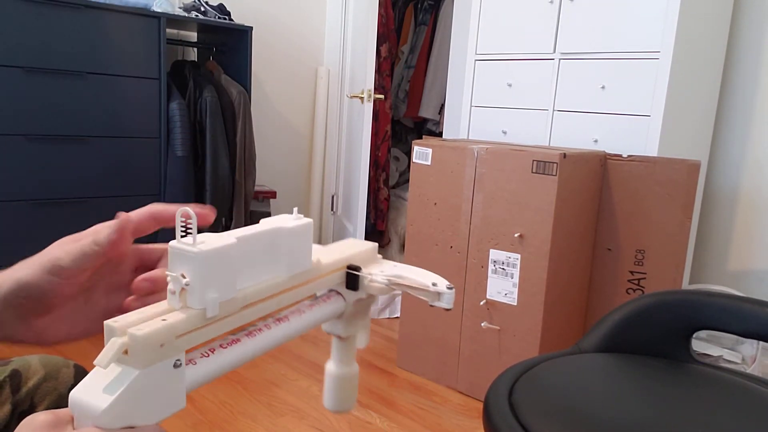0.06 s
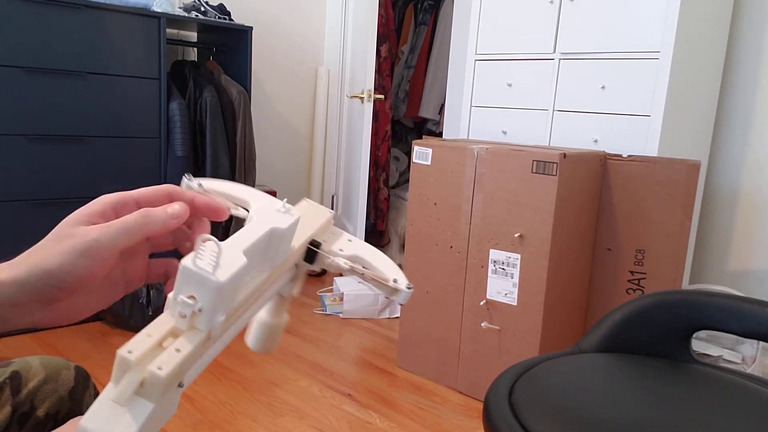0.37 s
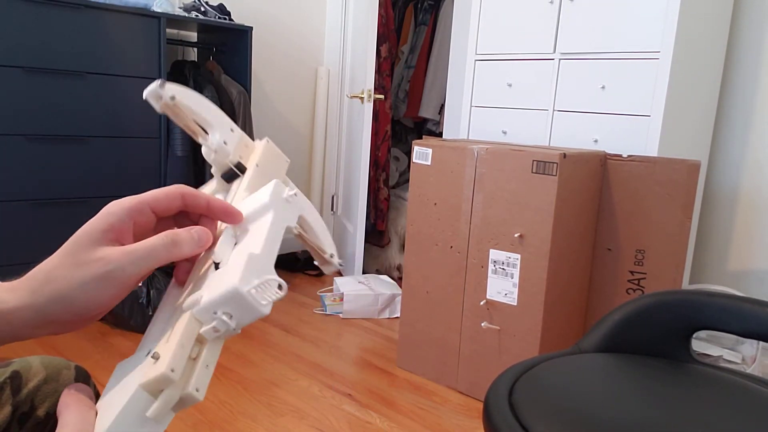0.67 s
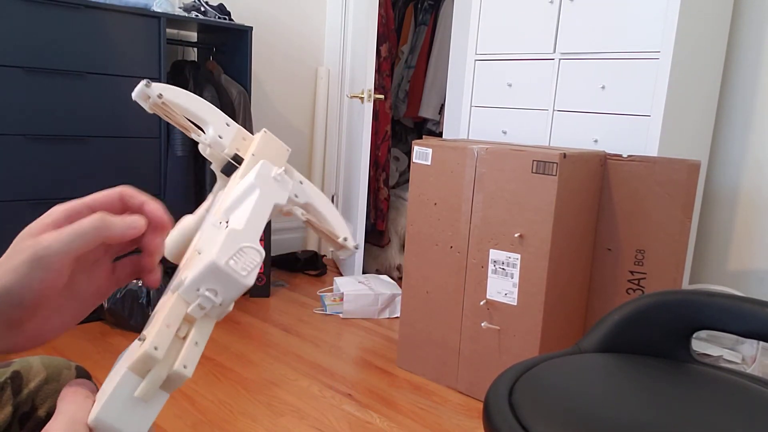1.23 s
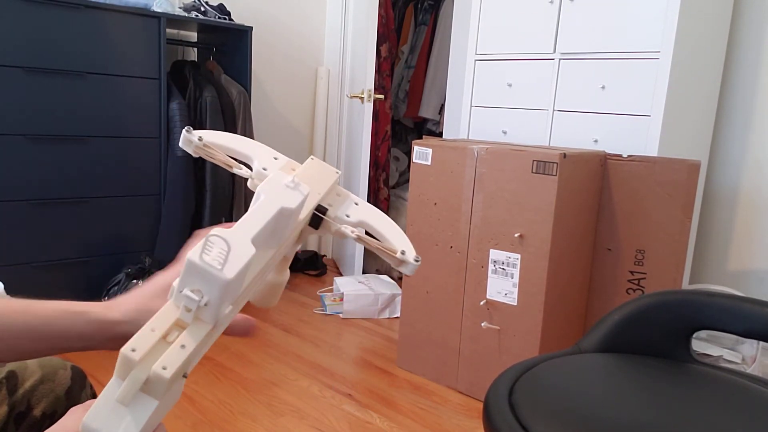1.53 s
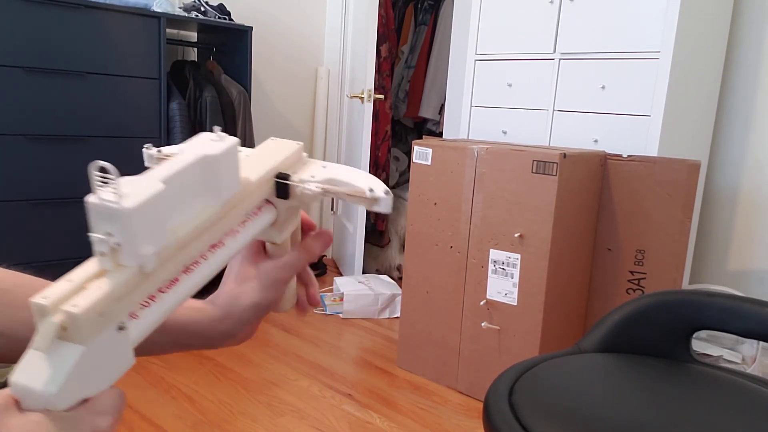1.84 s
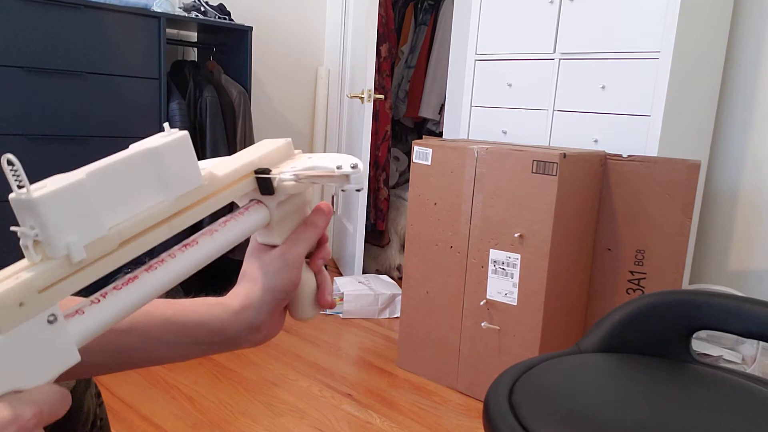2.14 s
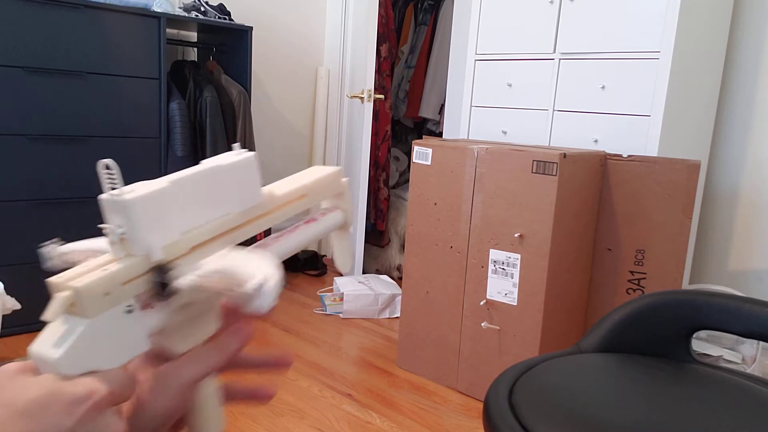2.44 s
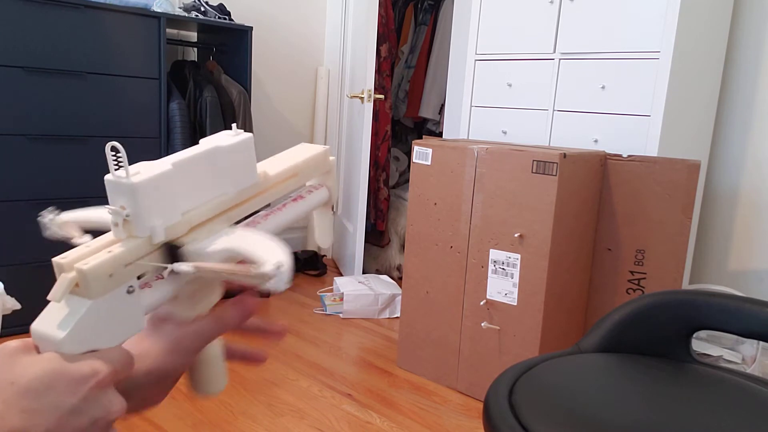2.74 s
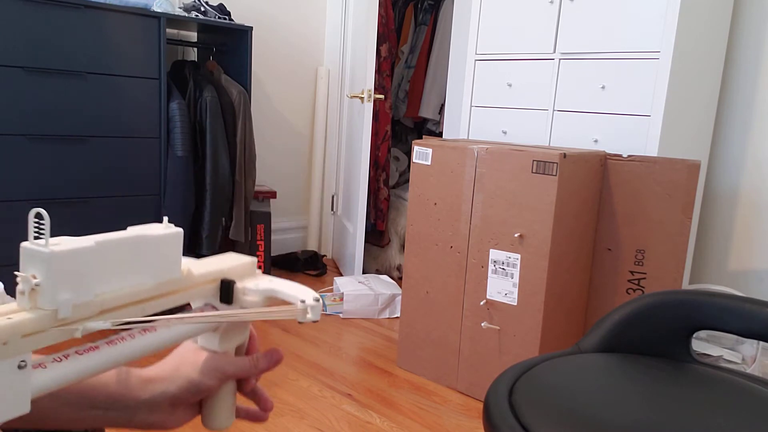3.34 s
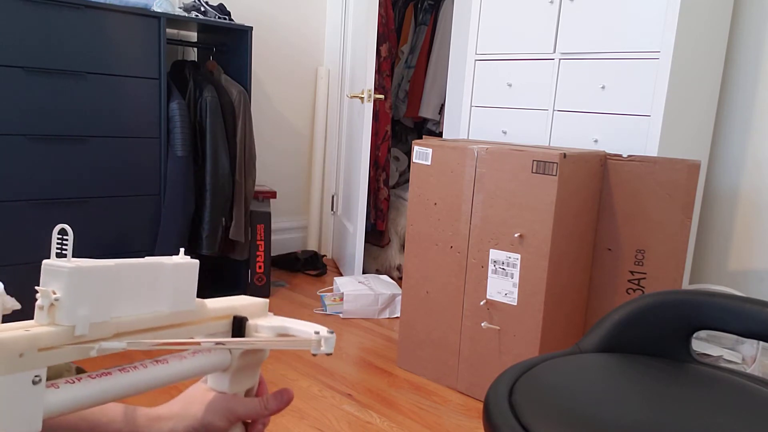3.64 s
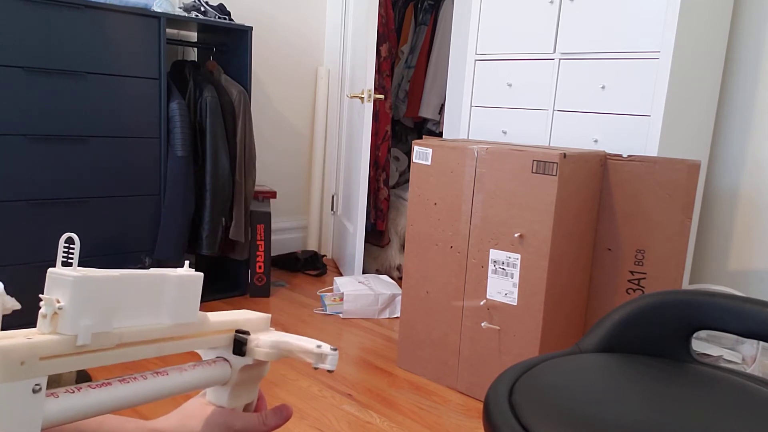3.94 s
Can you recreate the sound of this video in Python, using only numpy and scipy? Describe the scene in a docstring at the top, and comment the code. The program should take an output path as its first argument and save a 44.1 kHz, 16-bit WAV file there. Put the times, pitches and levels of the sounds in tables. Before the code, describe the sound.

A wood and plastic pump crossbow is handled up close, with soft rubs and a cluster of clicks around 1 second as a bolt is seated. The pump scrapes back to a hard stop at 2.5 seconds and clacks home, loudest, just after 3. Small ticks follow, then the string snaps sharply near 4 seconds. Each contact echoes briefly in a small, bare room over a faint appliance hum.

```python
"""In a small, bare room, a home-made pump crossbow of wood and printed plastic is handled up close.
Fingers seat a bolt with a few clicks; the pump slides back to a hard stop, clacks home again,
and the string snaps free. Every contact makes the stock (the crossbow's body) and the room ring.
An appliance hums in the background."""
import sys
import numpy as np
from scipy import signal
from scipy.fft import rfft, irfft, next_fast_len
from scipy.io import wavfile
from scipy.ndimage import map_coordinates

SR = 44100
rng = np.random.default_rng(int(sys.argv[2]) if len(sys.argv) > 2 else 0)


def generate_wav(sig):
    """Save sig (samples, or channels by samples) to the path in sys.argv[1] as 16-bit PCM at SR."""
    pcm = np.round(np.clip(np.atleast_2d(sig).T, -1, 1) * 32767).astype(np.int16)
    wavfile.write(sys.argv[1], SR, pcm)


N = 176400


def amp(db):
    """Turn decibels into a number to multiply by."""
    return 10 ** (np.asarray(db) / 20)


def unit(x):
    """Scale a signal to an average power of 1."""
    return x / np.sqrt(np.mean(x ** 2) + 1e-20)


def along(points, hz):
    """Read between (frequency, value) points, giving each octave about the same space."""
    f, v = np.transpose(points)
    return np.interp(np.log(hz + 1), np.log(f + 1), v)


def wobble(rate, size):
    """A smooth curve through `rate` random values a second."""
    return map_coordinates(rng.standard_normal(size // 16), [np.arange(size) * rate / SR], mode="wrap")


def coloured(x, gain):
    """Filter x by gain(frequency), so that any ringing comes after the sound that causes it."""
    m = 2 * next_fast_len(x.shape[-1] // 2 + 2048, True)
    log_gain = np.log(np.maximum(gain(np.fft.rfftfreq(m, 1 / SR)), 1e-6))
    cepstrum = irfft(log_gain, m)
    cepstrum[1:m // 2] *= 2  # fold the part before time zero onto the part after it
    cepstrum[m // 2 + 1:] = 0
    return irfft(rfft(x, m) * np.exp(rfft(cepstrum)), m)[..., :x.shape[-1]]


def pair(two, alike):
    """Blend two unrelated signals into left and right; likeness 0 is unrelated, 1 is the same."""
    angle = np.arccos(np.clip(alike, -1, 1)) / 2
    middle, side = np.cos(angle) * two[0], np.sin(angle) * two[1]
    return np.array([middle + side, middle - side])


def add(out, s, x):
    """Mix x into out, starting at s seconds."""
    i = max(round(s * SR), 0)
    out[:, i:i + x.shape[1]] += x[:, :N - i]


def air():
    """The steady, low rumble of the room's air."""
    # strength of the rumble from low to high: f/Hz, level/dB
    spectrum = [(20, -25.5), (35, -8), (52, 3.5), (75, -0.5), (100, -5.5), (130, -6.5), (190, -7),
                (270, -2.5), (400, -11.5), (600, -13.5), (1000, -21.5), (1500, -21), (2500, -31),
                (4000, -38.5), (6000, -47), (9000, -53.5), (13000, -42), (15500, -46)]
    # how alike the two ears hear it: f/Hz, likeness
    alike = [(50, 1), (250, 0.79), (600, 0.51), (1500, 0.06), (8000, 0.061)]
    hz = np.fft.rfftfreq(N, 1 / SR)
    noise = pair(rfft(rng.standard_normal((2, N))), along(alike, hz))
    rumble = unit(irfft(noise * amp(along(spectrum, hz)), N))
    return amp(-57.5) * rumble * amp([[-1.5], [0.5]])  # left, right


def appliance_hum(waver_db=2.4):
    """Mains power makes an appliance hum in three wavering tones."""
    # the tones of the hum: f/Hz, level/dB
    tones = [(120, -70), (240, -59.5), (360, -69.5)]
    # slow rise and fall of the whole hum: t/s, gain/dB
    swell = [(0, -3), (1.0, -1.5), (1.7, 0), (2.2, 5), (2.6, -1), (3.3, 4), (4, -2.5)]
    t = np.arange(N) / SR
    hum = np.zeros(N)
    for hz, db in tones:
        peak = np.sqrt(2) * amp(db + waver_db * wobble(1.5, N))
        hum += peak * np.sin(2 * np.pi * (hz * t + rng.random()))
    return hum * amp(np.interp(t, *np.transpose(swell))) * amp([[-4.5], [0]])  # left, right


def stock(force, s, colour, tone_db, drawn_s=2.9):
    """A force at time s makes the stock ring, at different pitches from the time the bow is drawn."""
    # resonances (pitches that ring) of stock and shell, bow slack: f/Hz, width/Hz, level/dB
    slack = [(792, 27, -2), (1156, 56, -6), (1270, 67, -9.5), (1460, 67, -11), (1669, 33, 0),
             (1937, 76, -4), (2290, 120, -10), (2660, 73, -1.5), (3078, 42, 3), (3483, 34, 0),
             (4125, 110, -9.5), (5450, 340, -7.5), (7200, 96, -9.5), (7430, 1460, -4), (11370, 250, -4)]
    # the same with the bow drawn: f/Hz, width/Hz, level/dB
    drawn = [(510.5, 26, 9), (763, 130, -4.5), (1370, 69, -5.5), (1637, 39, 4), (2003, 37, 0.5),
             (2900, 210, -5), (2980, 91, -4.5), (3610, 52, -3.5), (3860, 91, 1), (4180, 73, -5),
             (5010, 230, -15), (7160, 250, -5.5), (10150, 200, -10)]
    # centres of the bass, body, crack and sizzle bands that tone_db turns up or down: f/Hz
    bands = [600, 1600, 4500, 11500]
    modes = slack if s < drawn_s else drawn
    tone = list(zip(bands, tone_db))

    def gain(f):
        ringing = sum(amp(db) * 1j * f * width / (centre ** 2 - f ** 2 + 1j * f * width)
                      for centre, width, db in modes)
        return abs(1 + ringing) * amp(along(colour, f) + along(tone, f))

    return coloured(pair(force, alike=0.5), gain)


def in_room(x, room_db, delay_s=0.00072, build_s=0.0077, left_lag_s=0.00007):
    """The sound arrives from right of centre, then its echo off the bare walls builds up and fades."""
    # time the echo takes to fade by 60 dB (called t60): f/Hz, t60/s
    fade_times = [(150, 0.32), (600, 0.63), (1500, 0.49), (3000, 0.56), (5500, 0.53), (8000, 0.44),
                  (11500, 0.42), (16000, 0.37)]
    # tone of the echo: f/Hz, gain/dB
    tone = [(200, 0), (1500, 3), (4500, 1), (12000, -2)]
    # how alike the two ears hear the echo: f/Hz, likeness
    alike = [(150, 1), (400, 1), (900, 0.2), (2500, 0.031)]
    # the far, left ear gets less treble: f/Hz, gain/dB
    shadow = [(200, 3), (800, -0.5), (2000, -2), (12000, -5)]
    hz, t, noise = signal.stft(rng.standard_normal((2, SR)), SR, nperseg=256)
    hz = hz[:, None]
    fading = pair(noise, along(alike, hz)) * amp(-60 * t / along(fade_times, hz) + along(tone, hz))
    build = 1 - np.exp(-(np.maximum(np.arange(SR) / SR - delay_s, 0) / build_s) ** 2)
    tail = signal.istft(fading, SR, nperseg=256)[1][:, :SR] * build
    out = signal.fftconvolve(x, unit(tail) / np.sqrt(SR), axes=1)
    out *= amp(room_db) * amp([[-1.7], [3.5]])  # left, right
    left = coloured(x[0], lambda f: amp(along(shadow, f)))
    left = np.pad(left, (round(left_lag_s * SR), 0))[:x.shape[1]]
    out[:, :x.shape[1]] += np.array([left, x[1]]) * amp([[-1.5], [3.5]])
    return out


def sliding(grit_db=2, grit_per_s=390, squeak_db=6.5, edge_s=0.0097):
    """Pump, bolt and fingers rub with a gritty, faintly squeaky sound, louder as they move faster."""
    # strokes: t/s, length/s, end level/dB, growth/dB, crack/dB, sizzle/dB, squeak/Hz
    strokes = [(0, 0.06, -65, -12.5, -8, -17.5, 4400), (0.062, .14, -68, -3, -10.5, -22, 2300),
               (0.494, 0.065, -73.5, -12.5, -10.5, -11.5, 5660), (0.649, 0.056, -57.5, 5.5, -12, -22, 1860),
               (.72, 0.065, -66, -3, -10, -27, 2300), (0.988, 0.11, -46, 9.5, 3, -8, 2500),
               (1.822, 0.093, -69, 7, 3, 1, 13100), (2.108, 0.23, -68.5, -5, -11.5, -15.5, 2515),
               (2.289, 0.062, -54.5, 13, 7, 8, 6930), (2.356, 0.15, -46, 9, 10, 10, 1280),
               (2.771, 0.15, -58.5, -0.5, 0, 3, 1300), (3.004, 0.043, -44, 13, 12, 11, 5200)]
    # tone of the rubbing: f/Hz, gain/dB
    colour = [(100, -10.5), (700, -2.5), (1500, -3.5), (3000, -7.5), (5500, -8.5), (7500, -10.5),
              (8500, -13.5), (11500, -12), (15500, -12)]
    out, t = np.zeros((2, N)), np.arange(SR // 3) / SR
    for s, length, db, growth_db, crack, sizzle, squeak_hz in strokes:
        grit = unit(rng.standard_normal((2, len(t))) * amp(grit_db * wobble(grit_per_s, len(t))))
        squeak = amp(squeak_db) * signal.lfilter(*signal.iirpeak(squeak_hz, Q=11, fs=SR), grit)
        edges = np.clip(np.minimum(t, length + edge_s - t) / edge_s, 0, 1)
        growth = amp(growth_db * np.minimum(t / length - 1, 0))
        rub = stock((grit + squeak) * edges * growth, s, colour, [0, 0, crack, sizzle])
        add(out, s, in_room(amp(db + 7.5) * rub, room_db=-3.5))
    return out


def contact(s, tone_db, t60, size=4096):
    """Two parts meet in a brief chatter that shakes the stock; long, soft contacts start gently."""
    # tone of a contact: f/Hz, gain/dB
    colour = [(60, -24.5), (250, -15.5), (420, -11.5), (560, -17), (900, -7), (1400, 1.5), (2100, -1.5),
              (3500, -3.5), (5400, -2.5), (6300, -5), (7400, -6), (8300, -12), (11500, -8.5), (15500, -12)]
    t = np.arange(size) / SR
    rise_s = 0.042 * t60 ** 2 / 0.049  # 4.2% of t60 when t60 is 0.049 s; far less for short contacts
    fade = amp(-60 * t / t60) * (1 - np.exp(-t / rise_s))
    chatter = rfft(rng.standard_normal((2, size)) * fade)
    even_chatter = irfft(chatter / abs(chatter))  # equally strong at every frequency
    force = unit(even_chatter * np.sqrt(fade)) / np.sqrt(size)
    return stock(force, s, colour, tone_db)


def taps():
    """Loose parts click and rattle against the stock."""
    # light contacts: t/s, level/dB, bass/dB, crack/dB, sizzle/dB, t60/s
    touches = [(0.139, -79.5, 6, -16, 17.5, .035), (.156, -51, 15.5, -10, -28, 0.06),
               (0.674, -39.5, -17, -34, -26, 0.025), (.688, -44.5, -23, -18, -17, 0.059),
               (0.9863, -52, -13, 1.5, -2.5, 0.059), (1.009, -38, -14, -22, -23.5, 0.018),
               (1.0156, -37.5, -30, -7.5, -26, 0.032), (1.035, -34.5, -9, -10, -16, 0.079),
               (1.048, -39, 3.5, -11, -18, 0.044), (1.064, -35.5, -5, 5, 1, 0.03),
               (1.077, -35, -11, 1, 0, 0.047), (1.087, -47, 1, -1.5, 18, 0.016),
               (1.106, -39, 0, -11, -9, 0.017), (1.115, -42, 9, -6, 6, 0.018),
               (1.692, -47.5, 4.5, -7.5, -13.5, 0.088), (1.811, -49.5, -6, -19, -23, 0.034),
               (1.98, -37.5, 1, -11.5, -13, 0.018), (1.984, -39.5, -1, -12, -20, 0.014),
               (2.103, -41.5, -13, -11, -23.5, 0.033), (2.362, -51, 21.5, 0.5, -13, 0.059),
               (2.4, -31.5, -3, -18, -16, 0.035), (2.4279, -32, 2.5, -6.5, -8.5, 0.024),
               (2.434, -45, -5, 14.5, 4, 0.013), (2.4649, -40, -2.5, 12, 11, 0.045),
               (2.471, -30.5, 1, -6, -2.5, 0.053), (2.556, -27.5, 0, 1.5, -1, 0.051),
               (2.755, -47, -10.5, -9.5, -12.5, 0.016), (2.81, -47.5, 12, -0.5, -8, 0.075),
               (2.93, -39, 2.5, -13, -18, 0.049), (2.949, -40.5, 3, -7, -1.5, 0.041),
               (2.958, -45, 3, -5.5, -20, 0.028), (3.019, -43.5, 15, 6.5, 4, 0.032),
               (3.024, -28.5, -5, -8.5, -11, 0.02), (3.028, -27, -7, -6.5, -1.5, 0.022),
               (3.043, -41.5, 9, 5.5, -1, 0.031), (3.219, -36.5, 5, -3, -17, 0.043),
               (3.348, -48.5, 3, -14.5, -25.5, 0.052), (3.486, -49, -4, -4, -16, 0.032),
               (3.517, -55, 14, -8, -12.5, 0.039), (3.687, -54, 10, -18, -30, 0.02)]
    out = np.zeros((2, N))
    for s, db, bass, crack, sizzle, t60 in touches:
        tap = amp(db + 31.5) * contact(s, [bass, 0, crack, sizzle], t60)
        add(out, s, in_room(tap, room_db=-3.5))
    return out


def handling():
    """The crossbow's body rumbles softly as the hands turn and grip it."""
    # swells of the rumble: middle t/s, half length/s, level/dB
    swells = [(0.745, 0.22, -58), (2.197, 0.19, -57.5)]
    # tone of the rumble: f/Hz, gain/dB
    tone = [(20, -20), (45, 4.5), (70, 6.5), (130, -4), (190, -6), (300, -21), (500, -15), (1500, -45.5),
            (6000, -85.5)]
    hz, t = np.fft.rfftfreq(N, 1 / SR), np.arange(N) / SR
    rumble = unit(irfft(rfft(rng.standard_normal(N)) * amp(along(tone, hz)), N))
    return rumble * sum(amp(db) * np.exp(-((t - s) / half) ** 2) for s, half, db in swells)


def clacks():
    """The pump hits its end stops and the string snaps free, each striking the stock hard."""
    # hard blows: t/s, level/dB, bass/dB, crack/dB, sizzle/dB, t60/s, echo/dB
    blows = [(2.5158, -40.5, 22, 18, -9, 0.026, 4), (2.5171, -27.5, -8, 11, 17, 0.027, -1.1),
             (2.9916, -34, 9.5, 0.5, -22, 0.0099, -4.5), (3.0566, -25, 7, 10.5, 8, 0.017, -1.5),
             (3.0597, -22.5, 2.5, 5, 6, 0.03, -3), (3.9573, -42.5, 17, 8.5, 24, 0.0071, 8),
             (3.9597, -34, 4.5, 6.5, 21.5, 0.016, 2), (3.9664, -40.5, 0, 8, 21.5, 0.006, 13)]
    out = np.zeros((2, N))
    for s, db, bass, crack, sizzle, t60, room_db in blows:
        clack = amp(db + 30.5) * contact(s, [bass, 0, crack, sizzle], t60)
        add(out, s, in_room(clack, room_db))
    return out


def knocks():
    """The pump's end stops also wake the low tones of the hollow stock."""
    # the pump reaches each stop: t/s, level/dB
    stops = [(2.5178, -35.5), (3.0572, -24)]
    # tones of the hollow stock: f/Hz, level/dB, t60/s
    tones = [(520.3, -9, 0.095), (723, -3.5, 0.036), (765, -3, 0.034), (1344, -8, 0.063)]
    out, t = np.zeros((2, N)), np.arange(SR // 6) / SR
    ring = sum((-1) ** k * amp(db - 60 * t / t60) * np.sin(2 * np.pi * hz * t)
               for k, (hz, db, t60) in enumerate(tones))
    for s, db in stops:
        add(out, s, in_room(amp(db) * np.array([ring, ring]), room_db=-6.5))
    return out


def bow():
    """The drawn bow gives short pings as it settles."""
    # pings: t/s, low tone level/dB, high tone level/dB
    pings = [(2.93, -52, -43), (2.953, -62, -38), (3.058, -52, -18.5), (3.483, -47.5, -68.5),
             (3.518, -47, -62)]
    # the bow's two tones: f/Hz, t60/s
    tones = [(1044, .04), (3050, 0.041)]
    out, t = np.zeros((2, N)), np.arange(SR // 4) / SR
    for s, *levels in pings:
        ring = sum(amp(db - 60 * t / t60) * np.sin(2 * np.pi * hz * t)
                   for (hz, t60), db in zip(tones, levels))
        add(out, s, in_room(np.array([ring, ring]), room_db=-4.5))
    return out


def scene():
    """The room's background and all the sounds of the crossbow, added together."""
    return air() + appliance_hum() + handling() + clacks() + taps() + knocks() + sliding() + bow()


def record(dry, top_hz=15800, edge_hz=130):
    """Cut away the very highest treble."""
    m = next_fast_len(N + SR // 2)
    gain = .5 - .5 * np.tanh((np.fft.rfftfreq(m, 1 / SR) - top_hz) / edge_hz)
    return irfft(rfft(dry, m) * gain, m)[:, :N]


dry = scene()
out = record(dry)
generate_wav(out)
```